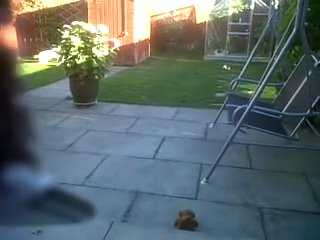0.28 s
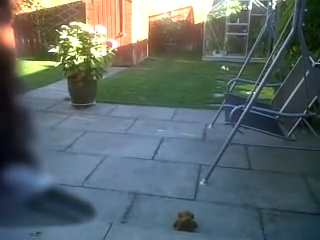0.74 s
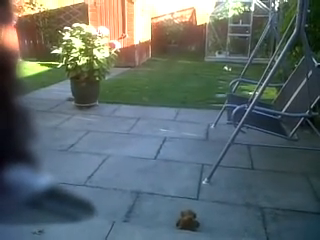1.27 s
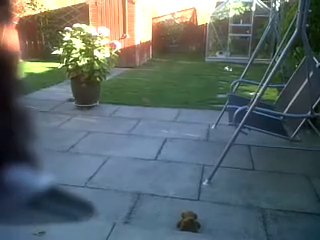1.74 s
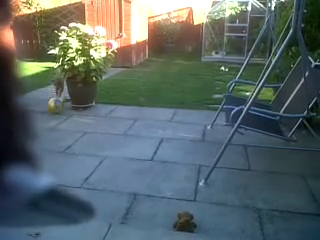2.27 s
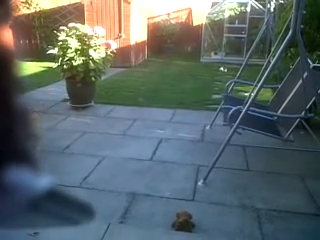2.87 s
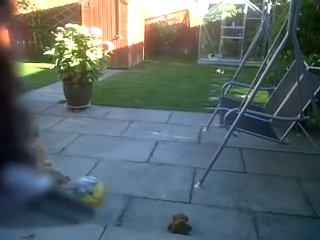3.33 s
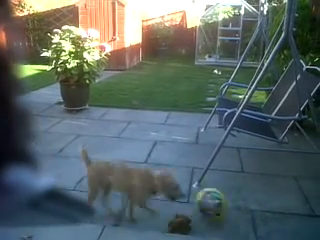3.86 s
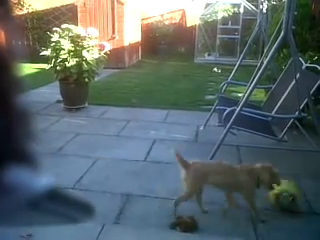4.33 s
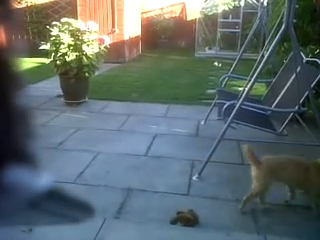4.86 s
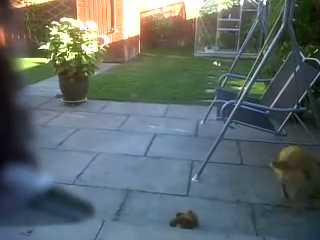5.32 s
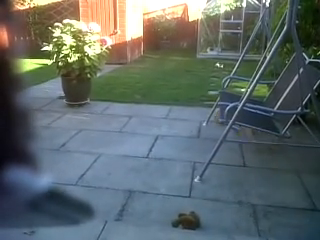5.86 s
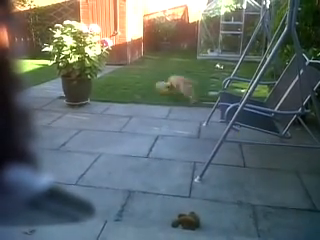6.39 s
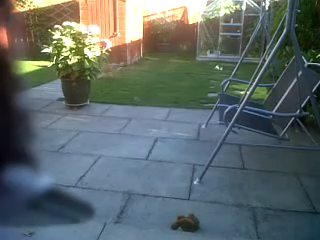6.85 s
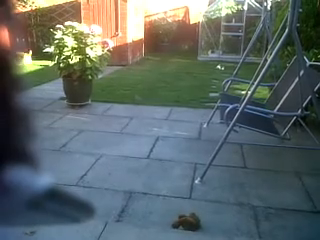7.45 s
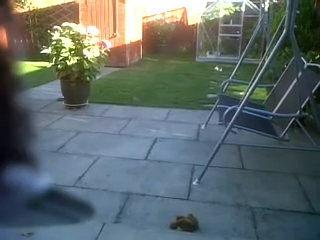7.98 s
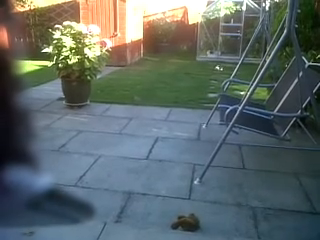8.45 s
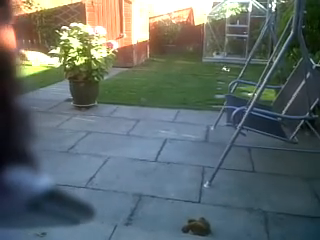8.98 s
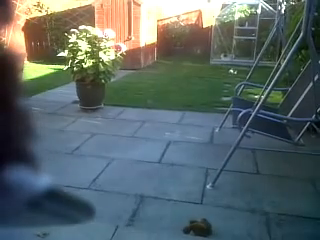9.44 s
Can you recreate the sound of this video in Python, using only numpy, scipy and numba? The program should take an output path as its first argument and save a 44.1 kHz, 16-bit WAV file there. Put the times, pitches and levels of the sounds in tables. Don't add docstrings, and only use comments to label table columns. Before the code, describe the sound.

In a walled garden with a paved patio, a small dog gives a quick run of high, hoarse barks, then chases a hollow ball. The ball ticks, thumps and scrapes over slabs among soft paw thuds. One loud bark interrupts the rolling; then barks return regularly to the end, echoing off hard walls. Faint distant traffic hums underneath. A narrow-band camera microphone squeezes and clips the loudest barks.

```python
import sys
import numpy as np
from scipy import signal
from scipy.io import wavfile
from scipy.ndimage import uniform_filter1d
from numba import njit

SR = 44100
rng = np.random.default_rng(int(sys.argv[2]) if len(sys.argv) > 2 else 0)


def voltage_ratio(decibels):
    exponent = np.asarray(decibels, float) / 20
    return 10 ** exponent


def waveform_to_disk(signal):
    frames = np.transpose(np.atleast_2d(signal))
    scaled = np.clip(frames, -1, 1) * 32767
    samples = np.round(scaled).astype(np.int16)
    wavfile.write(sys.argv[1], SR, samples)


N = 428211

# f/Hz, level per Hz/dB
TOWN_SPECTRUM = [(12, -43), (20, -28.5), (48, -4), (93, 1.5), (142, -3), (293, 3.5), (440, -2), (576, -3.5),
                 (846, -5), (1360, -1.5), (2130, -8.5), (2800, -15), (4390, -34.5), (5710, -64.5),
                 (9660, -120)]
TOWN_DB, HUM_HZ, HUM_DB = -58, 97.8, -72
# start t/s, opening note length/s, hoarse part length/s, peak level/dB, sag over the hoarse part/dB
BARKS = [(0, 0.0052, 0.022, -37.5, 3), (.06, 0.059, 0.07, -12.5, 4), (.6, .033, 0.037, -18.5, 1),
         (.882, .03, 0.032, -26, 4.5), (1.297, 0.033, 0.041, -22, 5.5), (2.842, .02, 0.084, -10.5, 6.5),
         (5.274, 0.025, 0.047, -11.5, 4), (5.682, 0.027, .1, -10, 6.5), (6.314, 0.026, .1, -12, 10.5),
         (6.886, 0.046, .08, -10.5, 8), (7.195, 0.046, 0.095, -10, 22.5), (7.676, .035, 0.073, -12.5, 8.5),
         (8.229, 0.015, 0.0097, -32.5, 2), (8.32, 0.041, 0.11, -16, 10), (8.985, 0.062, 0.031, -10.5, 8.5),
         (9.084, 0.021, 0.038, -12.5, 7), (9.448, 0.13, .075, -11.5, 6.5)]
# first f/Hz, top of the note f/Hz, hoarse f/Hz, roughness [0-1],
# strong-weak alternation of the cycles [0-1]
VOICES = [(479, 490, 450, .4, .5), (480, 655, 665, .45, 1), (591.5, 550, 670, 0.21, .95),
          (611, 783, 775, 0.5, 1), (790, 855, 600, .25, 0.44), (789, 918, 625, .3, 0.78),
          (800.5, 920, 615, .24, .2), (617, 707, 620, .3, 0.8), (772, 860, 745, 0.4, 1),
          (498.5, 550, 700, .3, .95), (467, 560, 545, .45, 0.1), (468.5, 500, 640, .35, 0.82),
          (570, 530, 500, 0.05, 0.1), (573.7, 736, 600, .45, 0.63), (471.4, 530, 590, 0.4, 0.5),
          (539, 590, 600, .4, 0.6), (537, 485, 648, .3, .6)]
# chest level/dB, jaw resonance f/Hz, mouth resonance f/Hz,
# facing level/dB, walls level/dB
STANCES = [(0, 940, 1740, 1.5, 5), (-5, 1020, 1660, 1.5, -6.5), (-2.5, 1147, 2110, -9, -6.5),
           (-29, 774, 1850, -2, -6), (2, 960, 1600, -5, -5.5), (-6, 950, 1830, 3, 0),
           (-2.5, 950, 1910, 2.5, -2), (-7, 1110, 1900, -1, 2), (-12, 1135, 1700, 0.5, 1),
           (-4, 1095, 2210, -3.5, 0.5), (-10, 1080, 1750, 0, -3), (-2.5, 974, 1570, -1.5, 0),
           (2.5, 1200, 1550, -11, 0), (-4.5, 1182, 1756, -2, 1.5), (-3.5, 1074, 1960, -7.5, 0.5),
           (-7, 1060, 1820, -6, -2), (-5.5, 1030, 1900, -2, 1)]
# f/Hz, width/Hz, level/dB
THROAT = [
    (643, 410, -9.5),
    (2660, 605, -8.5),
    (3185, 860, -14.5),
]
JAW_WIDTH_HZ, MOUTH_WIDTH_HZ, MOUTH_DB, TEETH_DB = 183, 323, -4.5, -2
ATTACK_S, BREAK_S, RELEASE_S, EDGE_DB = .008, .006, .025, 21.5
SWELL_DB_PER_S, SWELL_MAX_DB = 283, 21.5
NOTE_ROUGH, BREAK_ROUGH, BREAK_WEAK, END_PITCH = .4, 1.2, 0.45, .96
# delay t/s, level/dB
ECHOES = [
    (0.013, -10),
    (.023, -13),
    (0.038, -5.5),
    (.057, -13),
    (.075, -15),
    (.099, -13),
    (.129, -22),
]
GARDEN_T60_S, GARDEN_DB = 0.64, -12
# t/s, level/dB, f/Hz, slab level/dB
THUDS = [(0.466, -41, 190, -50.5), (1.975, -50, 193, -48), (1.999, -48, 161, -51), (2.014, -58, 186, -53),
         (2.845, -29.5, 279, -75), (3.023, -36, 215, -58.5), (3.109, -41, 216, -40), (3.209, -36, 344, -41),
         (3.222, -27.5, 277, -46), (3.277, -36, 240, -49), (3.37, -49, 226, -47), (3.409, -41, 285.5, -54),
         (3.427, -47, 277, -54), (3.604, -47, 350, -51.5), (4.799, -45, 293, -51), (5.266, -29.5, 252, -54),
         (5.676, -39, 300, -59.5), (6.481, -30.5, 250, -58.5), (7.091, -44, 384.6, -43),
         (7.334, -35, 256, -55.5), (7.8, -26.5, 296, -43), (7.814, -25.5, 268, -51.5),
         (7.865, -25, 336, -41.5), (9.374, -31, 240, -49), (9.387, -27, 300, -53.5), (9.4, -25.5, 250, -56),
         (9.419, -36, 199, -42.5), (9.444, -31.5, 363, -41)]
# t/s, level/dB
SCRAPES = [
    [(1.65, -73.5), (1.828, -58), (2.0, -52), (2.734, -64), (2.82, -55)],
    [(3.3, -56.5), (3.518, -54), (4.108, -61.5), (4.336, -89), (4.702, -51), (5.074, -85), (5.26, -58)],
]
# t/s, shell tick level/dB, hollow thump level/dB, tick f/Hz
KNOCKS = [(1.7245, -50.5, -71, 1200), (1.79, -38.5, -42, 1510), (1.8505, -43.5, -70, 1710),
          (2.0263, -39, -45, 2360), (2.0677, -40.5, -63, 1300), (2.154, -43, -52, 1880),
          (2.21, -56, -53, 2440), (2.4022, -41, -42.5, 2500), (2.5285, -39.5, -45, 1880),
          (2.6821, -36.5, -52, 2270), (3.1118, -33, -32.5, 1340), (3.1548, -33, -56, 2170),
          (3.3665, -32.5, -32.5, 1810), (3.4592, -42.5, -53, 2096), (3.49, -44, -62, 2250),
          (3.6049, -36, -46, 1860), (4.058, -40.5, -47, 1620), (4.281, -42.5, -57, 1850),
          (4.4959, -41.5, -46, 2200), (4.688, -45.5, -50, 2000), (4.8208, -37.5, -39, 1920),
          (4.9844, -42, -45.5, 1760), (5.1383, -39, -52, 1240), (6.1597, -42, -48.5, 1840),
          (6.2753, -36, -43, 1200)]
# f/Hz, width/Hz, level/dB
BALL_AIR = [
    (250, 78, 0),
    (445, 40, -20.5),
]


def rms1(x):
    return x / np.sqrt(np.mean(x ** 2))


def ring(x, hz, width):
    return signal.lfilter(*signal.iirpeak(hz, hz / width, fs=SR), x)


def walk(rate, size=N):
    hold = int(SR / rate)
    steps = np.repeat(rng.standard_normal(size // hold + 1), hold)
    return 1.494 * uniform_filter1d(uniform_filter1d(steps, hold), hold)[:size]


def place(out_len, s, sound):
    i = int(s * SR)
    return np.pad(sound, (i, out_len))[:out_len]


def town():
    out, swell = 0, walk(0.57)
    hz_points, db_points = np.transpose(TOWN_SPECTRUM)
    for hz in 25 * 2 ** np.arange(0, 8.1, 1 / 2):
        band = ring(ring(rng.standard_normal(N), hz, hz / 2), hz, hz / 2)
        db = np.interp(np.log(hz), np.log(hz_points), db_points) + swell + 0.5 * walk(22)
        out = out + voltage_ratio(db) * band
    hum = rms1(ring(rng.standard_normal(N), HUM_HZ, 4.1))
    return voltage_ratio(TOWN_DB) * rms1(out) + voltage_ratio(HUM_DB) * hum


def bark_shape(start, note, hoarse, peak_db, sag_db, first_hz, top_hz, hoarse_hz, rough, weak):
    lead_db = min(SWELL_DB_PER_S * note, SWELL_MAX_DB)
    end = start + note + hoarse
    return [(start, first_hz, peak_db - lead_db - EDGE_DB, NOTE_ROUGH * rough, 0),
            (start + min(ATTACK_S, note / 2), first_hz, peak_db - lead_db, NOTE_ROUGH * rough, 0),
            (start + note, top_hz, peak_db, NOTE_ROUGH * rough, 0),
            (start + note + BREAK_S, hoarse_hz, peak_db, BREAK_ROUGH * rough, BREAK_WEAK * weak),
            (end - hoarse / 2, hoarse_hz, peak_db - sag_db / 2, rough, weak),
            (end, hoarse_hz, peak_db - sag_db, rough, weak),
            (end + RELEASE_S, END_PITCH * hoarse_hz, peak_db - sag_db - EDGE_DB, rough, weak)]


@njit
def vocal_folds(hz, jitter, shimmer, weak, chance):
    pulses, phase = np.zeros(len(hz) + 1), np.empty(len(hz))
    p, cycle = .9, 0
    for i in range(len(hz)):
        step = hz[i] * max(1 + jitter[i] * chance[cycle, 0], .5) / SR
        p += step
        if p >= 1:
            p, cycle = p - 1, cycle + 1
            size = np.exp(shimmer[i] * chance[cycle, 1]) * (1 - weak[i] * (cycle % 2))
            pulses[i] += size * p / step
            pulses[i + 1] += size * (1 - p / step)
        phase[i] = p
    return pulses[:-1], phase


@njit
def moving_ring(x, hz, width):
    y, band, low = np.empty(len(x)), 0., 0.
    for i in range(len(x)):
        g, k = np.tan(np.pi * hz[i] / SR), width / hz[i]
        v = (band + g * (x[i] - low)) / (1 + g * (g + k))
        band, low, y[i] = 2 * v - band, low + 2 * g * v, k * v
    return y


def bark(rows, stance):
    s, *columns = np.transpose(rows)
    s = np.maximum.accumulate(s)
    t = np.arange(s[0], s[-1], 1 / SR)
    hz, level_db, rough, weak = (np.interp(t, s, c) for c in columns)
    rough, weak = np.clip(rough, 0, 1), np.clip(weak, 0, 1)
    chance = np.clip(rng.standard_normal((1000, 2)), -1.7, 1.7)
    air = rng.standard_normal(SR // 2)[:len(t)]
    wobble, throb = walk(90, size=SR)[:len(t)], walk(140.13, size=SR)[:len(t)]
    drifting_hz = hz * (1 + 0.1394 * rough * wobble)
    pulses, phase = vocal_folds(drifting_hz, .16 * rough, 0.34 * rough, weak, chance)
    breath = (0.18 + 2.0 * rough) * air * np.exp(-phase / 1.35)
    source = pulses * np.sqrt(SR / hz) + breath
    ring_out = (0, 600)
    source = np.pad(source * voltage_ratio(level_db + 3.9 * rough * throb), ring_out)
    under_peak_db = level_db - level_db.max()
    sharp = source * np.pad(voltage_ratio(0.16 * under_peak_db), ring_out)
    chest_db, jaw_hz, mouth_hz, facing_db, _ = stance
    opening = np.pad(np.clip(1 + 0.0037 * under_peak_db, .6, 1), ring_out, "edge")
    (chest_hz, chest_width, low_db), *teeth = THROAT
    voice = voltage_ratio(low_db + chest_db) * ring(source, chest_hz, chest_width)
    voice -= moving_ring(source, jaw_hz * opening, 1. * JAW_WIDTH_HZ)
    voice += voltage_ratio(MOUTH_DB + facing_db) * ring(source, mouth_hz, MOUTH_WIDTH_HZ)
    for k, (f, width, db) in enumerate(teeth):
        voice += (-1) ** (k + 1) * voltage_ratio(db + TEETH_DB + facing_db) * ring(sharp, f, width)
    return 6 * signal.sosfilt(signal.butter(2, 350, "high", fs=SR, output="sos"), voice)


def garden():
    t = np.arange(SR) / SR
    tail = rng.standard_normal(SR) * voltage_ratio(2.4 * walk(120.67, size=SR))
    tail = tail * (1 - np.exp(-t / 0.028)) * np.exp(-np.log(1000) * t / GARDEN_T60_S)
    out = voltage_ratio(GARDEN_DB) * tail / np.sqrt(np.sum(tail ** 2))
    smear = np.exp(-np.arange(900) / 130)
    for s, db in ECHOES:
        burst = rng.standard_normal(len(smear)) * smear
        burst = voltage_ratio(db) * burst / np.sqrt(np.sum(burst ** 2))
        out += place(SR, s * (1 + .08 * rng.standard_normal()), burst)
    return out


def thuds():
    out, t = np.zeros(N), np.arange(SR // 8) / SR
    for s, db, hz, slab_db in THUDS:
        push = rng.standard_normal((2, len(t))) * t * np.exp(-t / np.array([[.003], [.008]]))
        thud = ring(ring(push[0], hz, 0.51 * hz), hz, 2.7 * hz)
        slab = ring(ring(push[1], 87, 130), 80, 160)
        step = voltage_ratio(db - 2.0) * thud / abs(thud).max()
        step += voltage_ratio(slab_db + 5.5) * slab / abs(slab).max()
        out += place(N, s - .004, step)
    return out


def scrape():
    t, gain = np.arange(N) / SR, np.zeros(N)
    for rows in SCRAPES:
        s, db = np.transpose(rows)
        gain += voltage_ratio(np.interp(t, s, db - 9, -120, -120))
    grit = rng.standard_normal(N) * voltage_ratio(0.88 * rng.exponential(size=N))
    return gain * voltage_ratio(3.9 * walk(20)) * rms1(ring(grit, 1200, 2500))


def ball_knocks():
    out, t = np.zeros(N), np.arange(SR // 10) / SR
    for s, tick_db, thump_db, hz in KNOCKS:
        rattle = rng.standard_normal(len(t)) * np.exp(-t / 0.015) * (1 - np.exp(-t / 0.0024))
        tick = ring(rattle, hz, 500) + 0.11 * ring(rattle, 2000, 4100)
        push = rng.standard_normal(len(t)) * t * np.exp(-t / 0.0043)
        thump = sum(voltage_ratio(db) * ring(push, f, width) for f, width, db in BALL_AIR)
        knock = 1.1 * voltage_ratio(tick_db) * tick / abs(tick).max()
        knock += 2.08 * voltage_ratio(thump_db) * thump / abs(thump).max()
        out += place(N, s - .002, knock)
    return out


@njit
def squeeze(x, top, attack, release):
    y, envelope, gain = np.empty(len(x)), 0., 1.
    for i in range(len(x)):
        a = abs(x[i])
        envelope += (a - envelope) * (attack if a > envelope else release)
        gain += (min(1., top / (envelope + 1e-9)) - gain) * attack
        y[i] = x[i] * gain
    return y


def scene():
    ball = signal.sosfilt(signal.butter(5, 4300, fs=SR, output="sos"), ball_knocks())
    close = voltage_ratio(-5) * signal.fftconvolve(ball, garden())[:N] + scrape()
    for row, pitch, stance in zip(BARKS, VOICES, STANCES):
        voice = bark(bark_shape(*row, *pitch), stance)
        echoes = voltage_ratio(stance[-1]) * signal.fftconvolve(voice, garden())
        close += place(N, row[0], voice) + place(N, row[0], echoes)
    close = signal.sosfilt(signal.butter(9, 3850, fs=SR, output="sos"), close)
    return (close + ball + thuds() + town())[None]


def band_limit(x):
    return signal.sosfilt(signal.butter(12, 8700, fs=SR, output="sos"), x)


def record(dry):
    x = squeeze(dry[0], 0.4, 0.23, 0.00077)
    x = x - 0.18 * x ** 3
    over = x - np.clip(x, -.4, .4)
    x = np.clip(x - .15 * over, -.54, .54)
    x = signal.sosfilt(signal.ellip(8, .2, 80, 8100, fs=SR, output="sos"), x)
    return band_limit(x[None])


dry = scene()
out = record(dry)
waveform_to_disk(out)
```